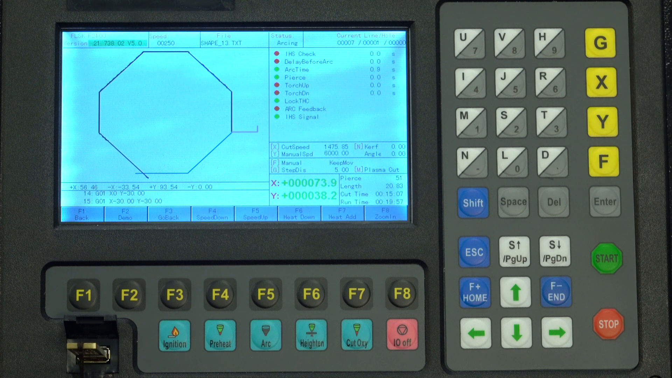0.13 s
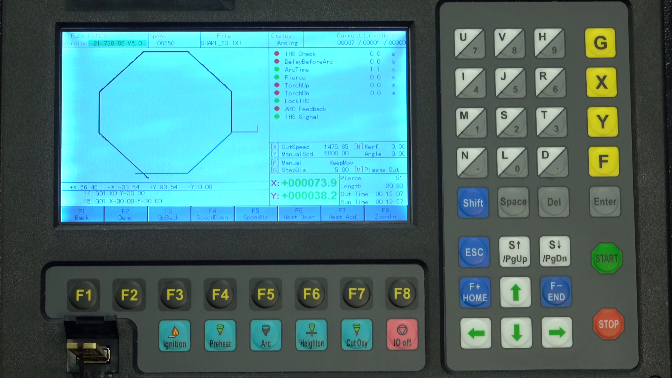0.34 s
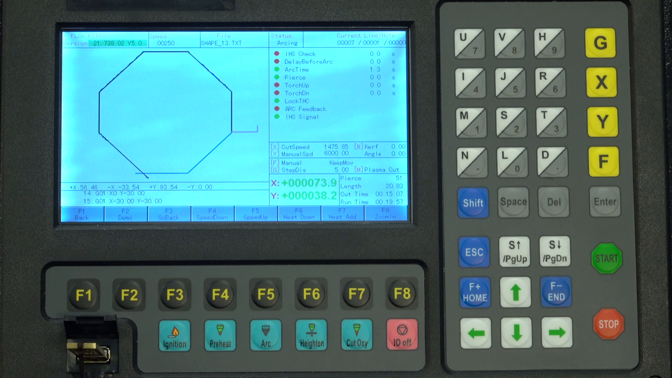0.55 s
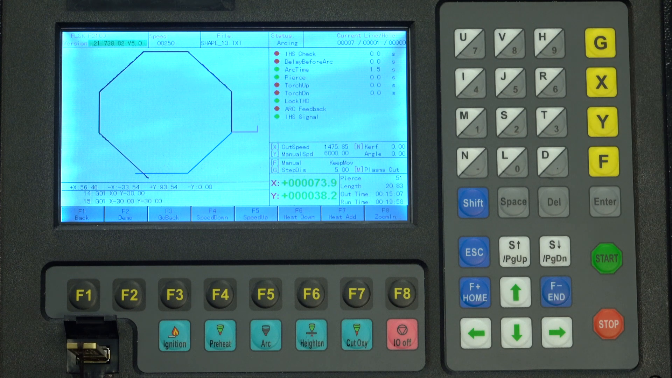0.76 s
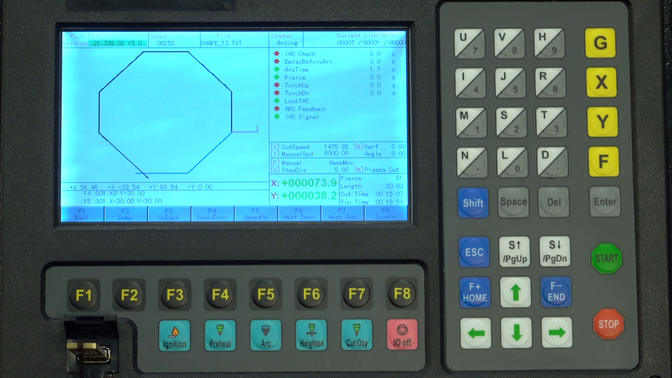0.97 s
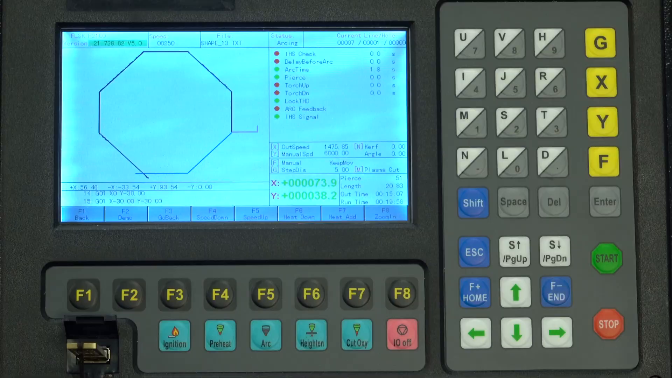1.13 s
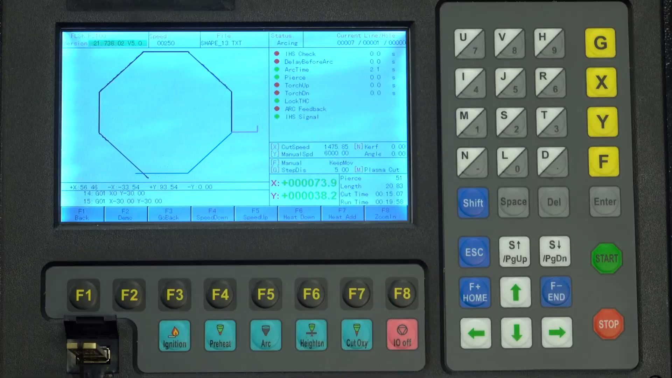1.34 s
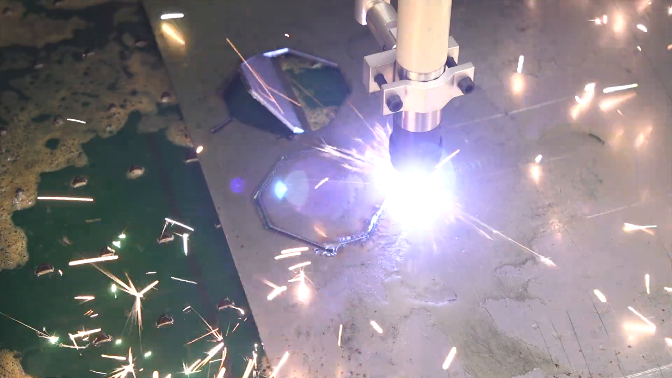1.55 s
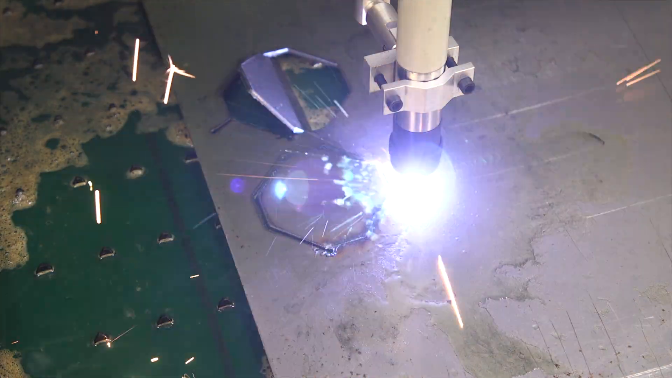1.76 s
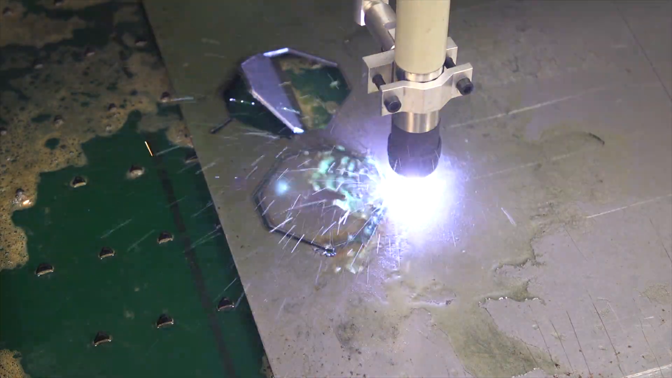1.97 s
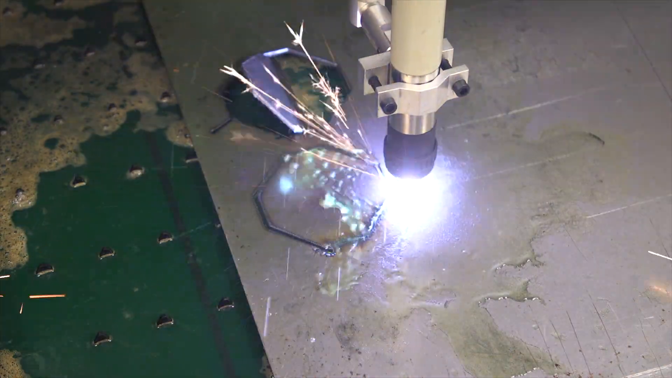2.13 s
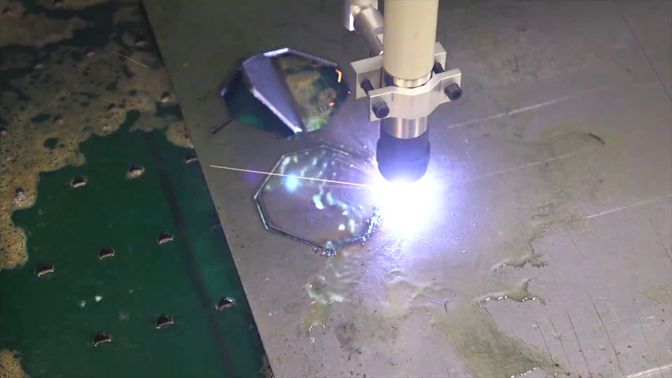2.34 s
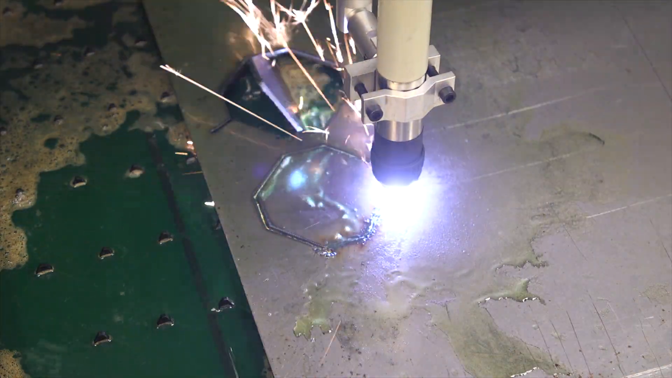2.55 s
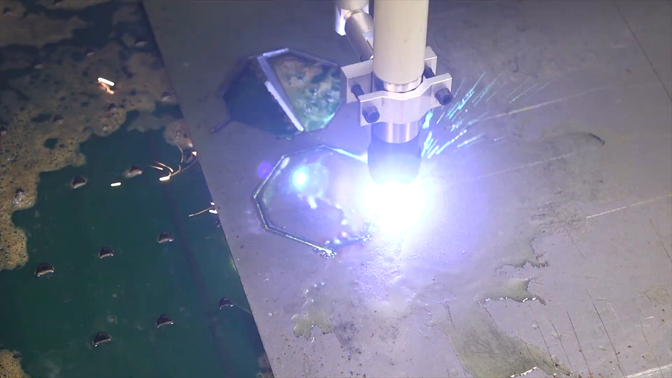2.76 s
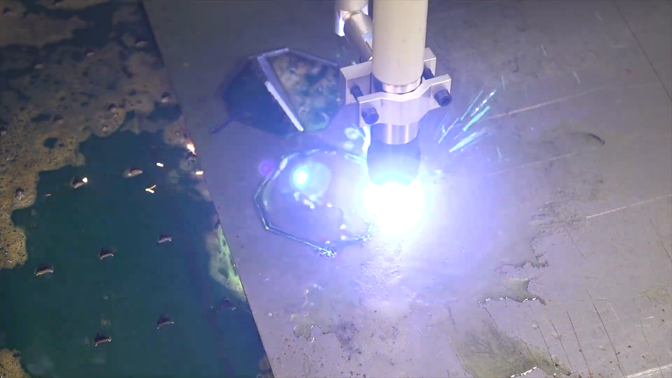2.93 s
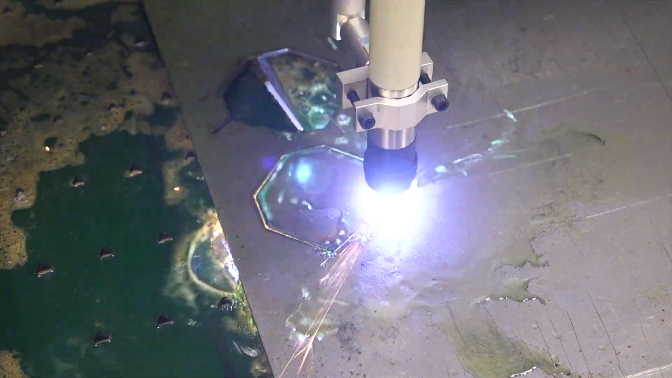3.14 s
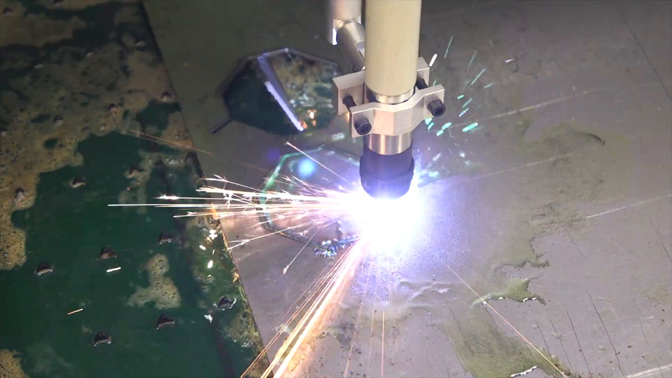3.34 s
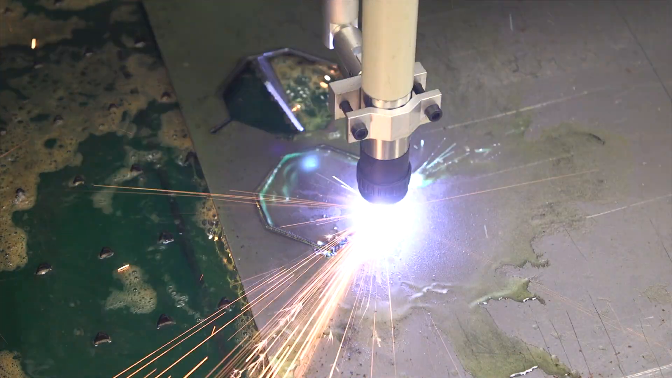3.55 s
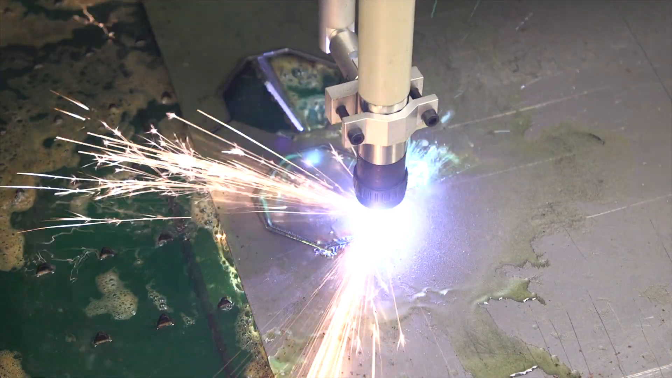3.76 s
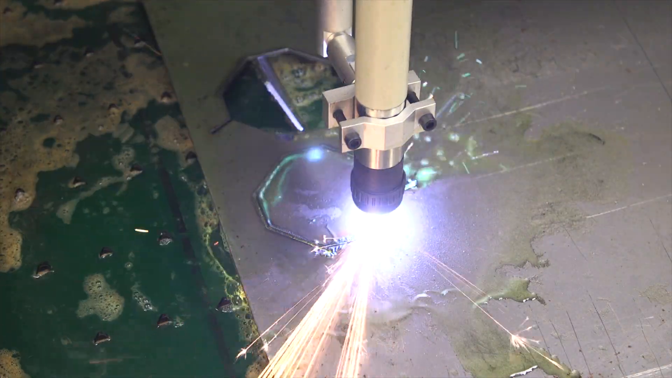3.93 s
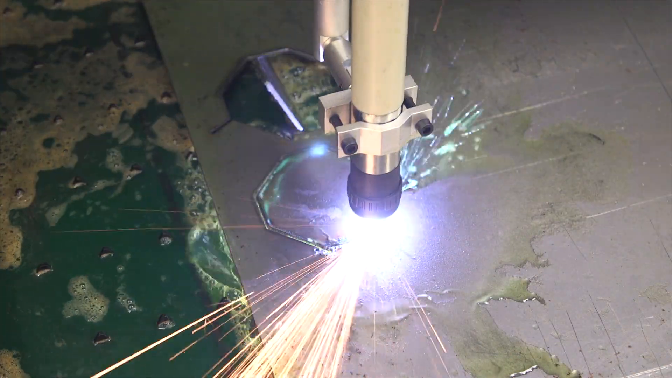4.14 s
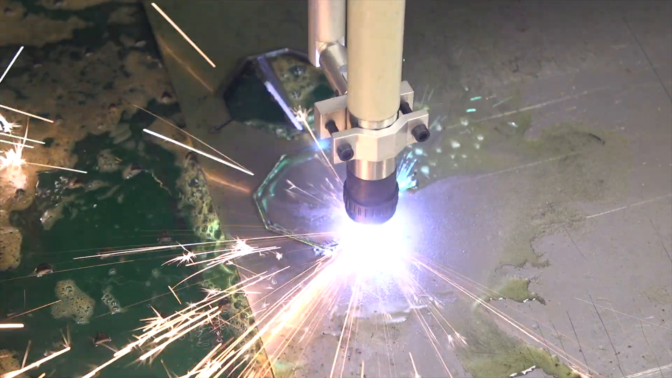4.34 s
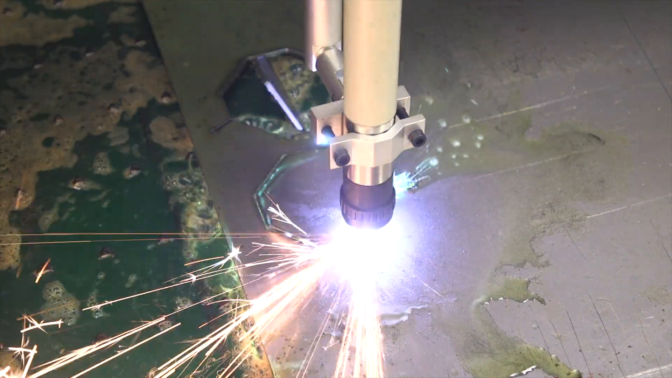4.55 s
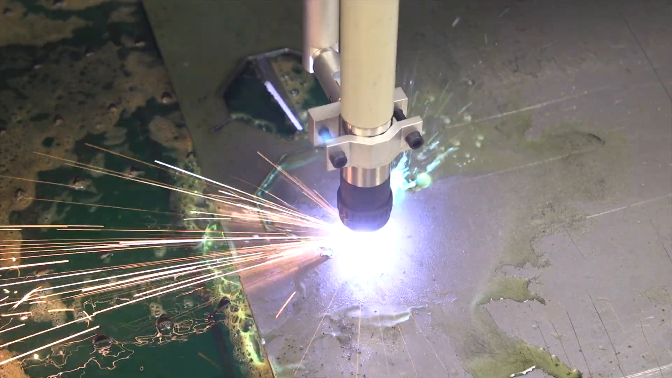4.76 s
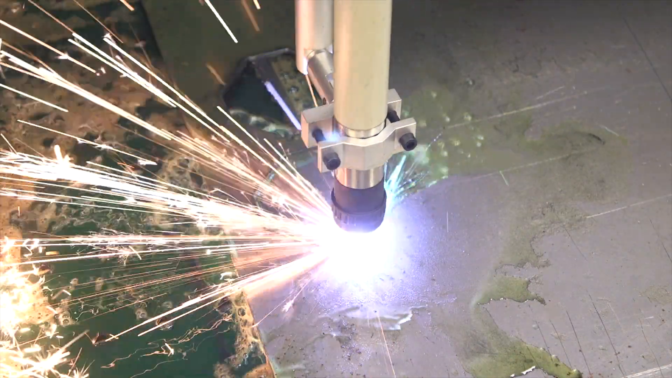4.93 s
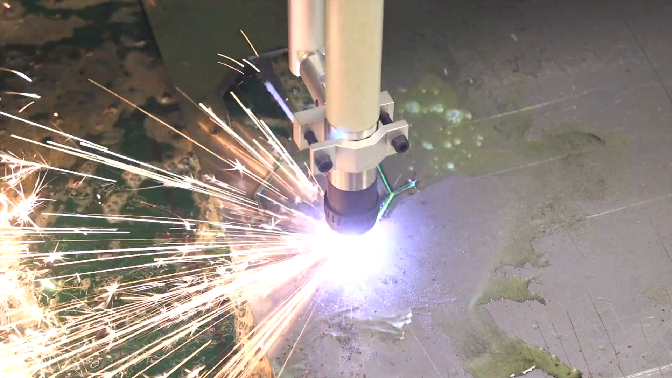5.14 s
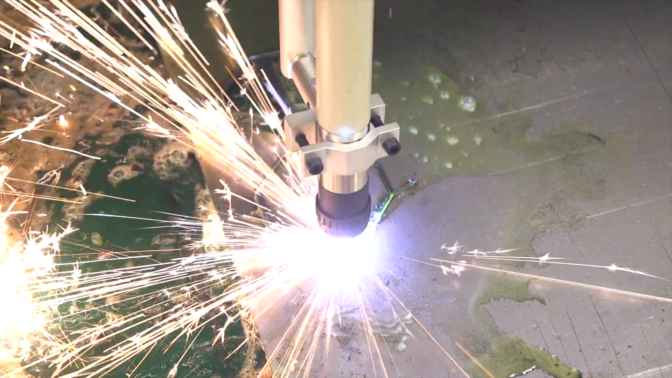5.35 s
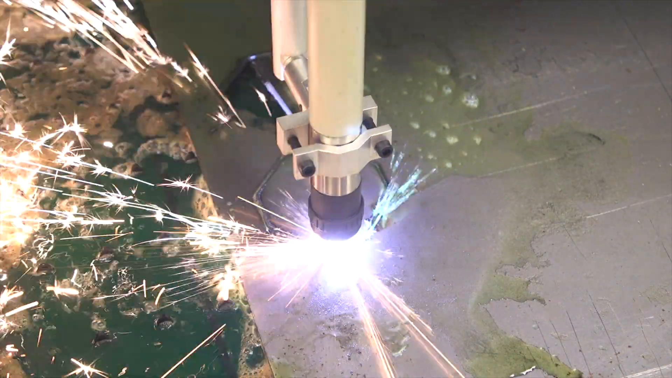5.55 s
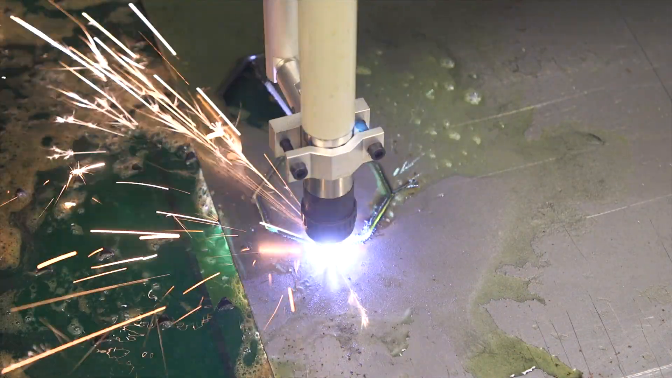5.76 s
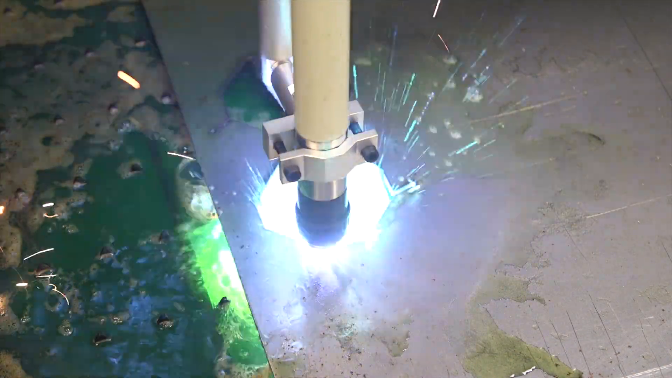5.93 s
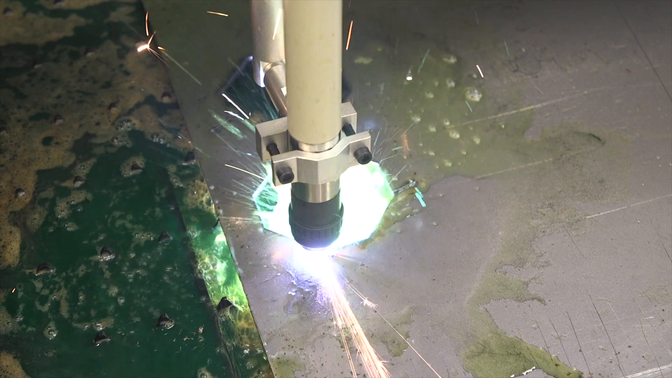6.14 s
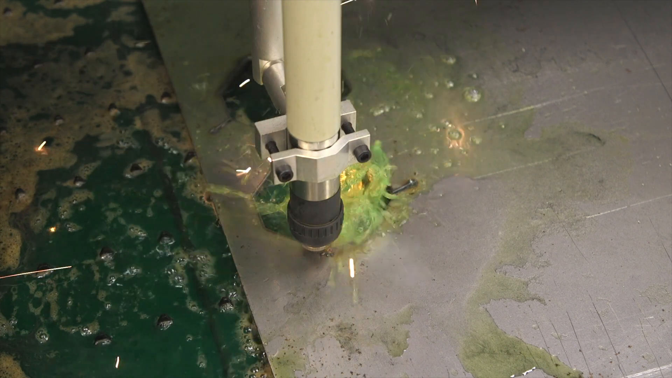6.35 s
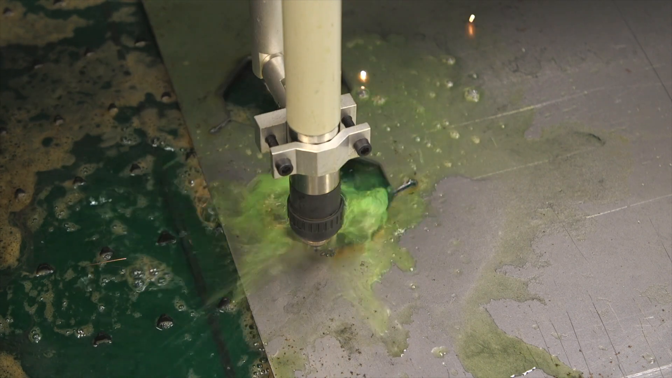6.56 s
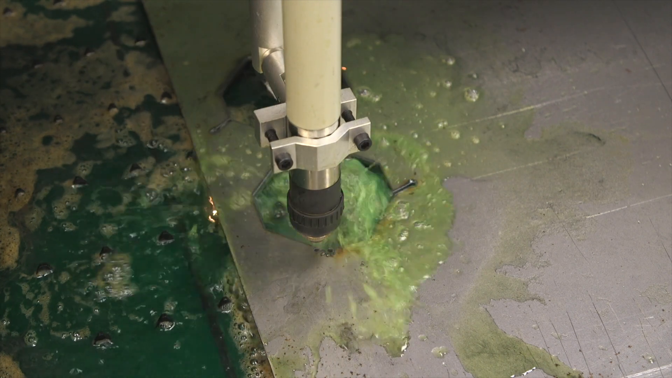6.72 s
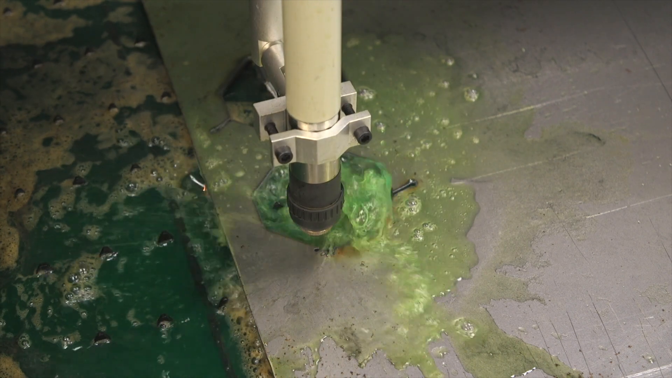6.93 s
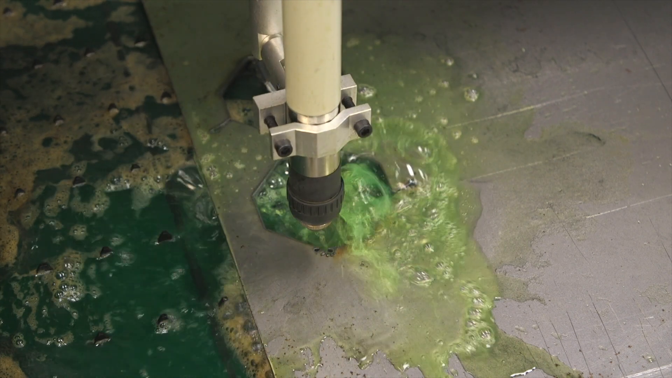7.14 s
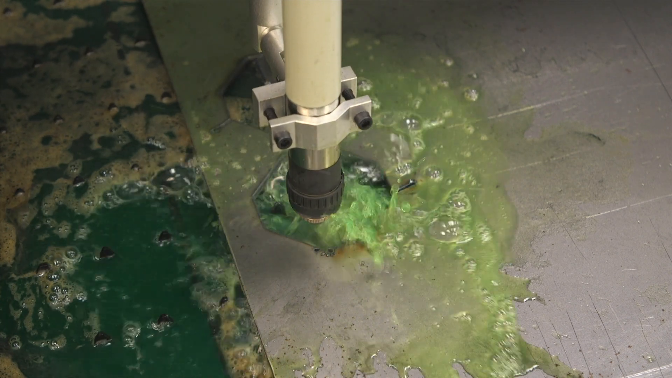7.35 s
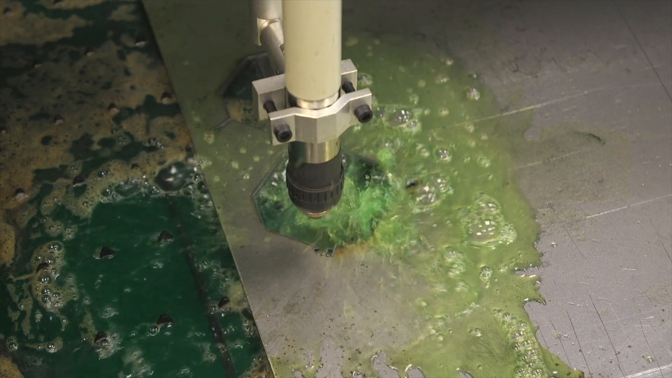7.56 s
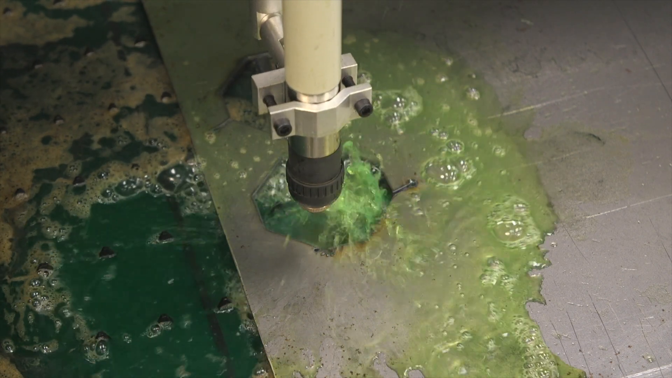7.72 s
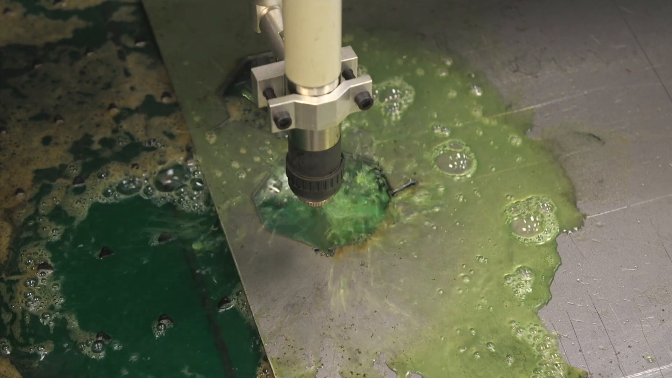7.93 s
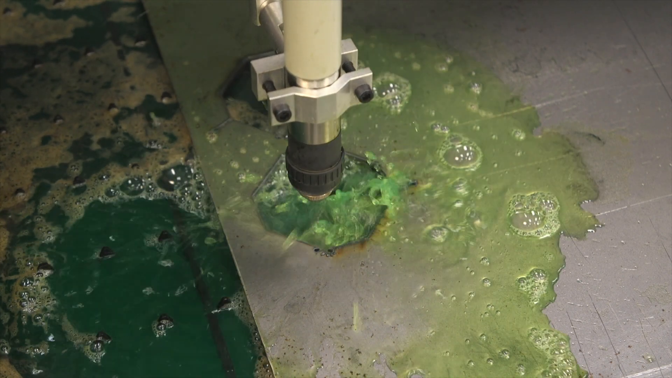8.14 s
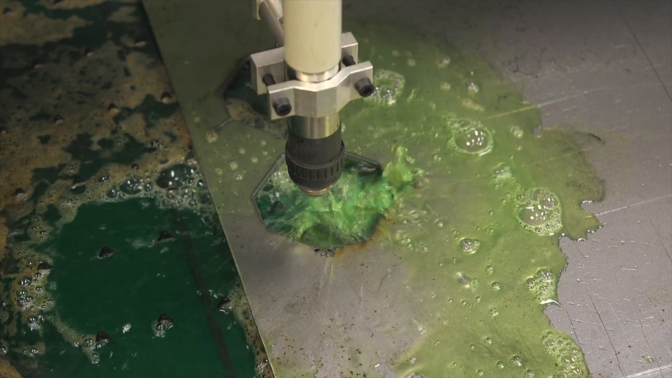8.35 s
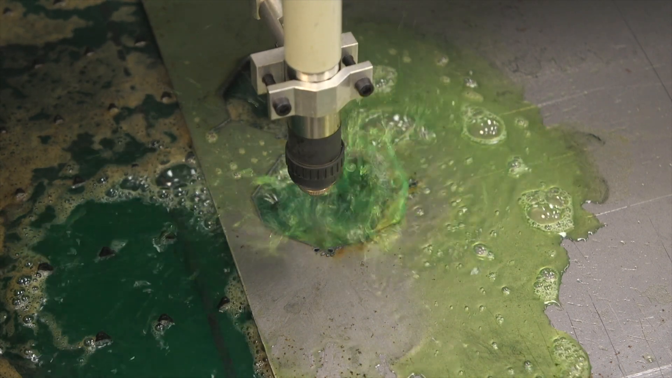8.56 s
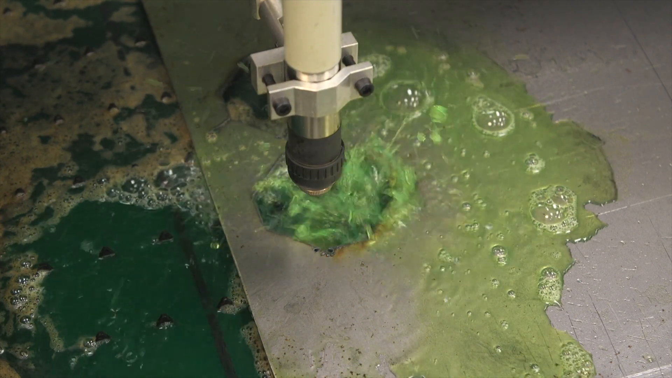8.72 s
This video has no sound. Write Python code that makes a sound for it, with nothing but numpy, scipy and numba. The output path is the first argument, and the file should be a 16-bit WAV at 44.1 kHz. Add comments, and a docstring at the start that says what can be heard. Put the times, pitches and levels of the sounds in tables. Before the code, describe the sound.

A plasma torch cuts steel with a loud hiss, sizzling and churning water, then stops, leaving softer hissing air and bubbling.

```python
"""A machine plasma torch cuts steel plate on a water table in a workshop, heard from close by.
Fans hum and the lift motor runs. At 1.3 s the air valve clacks, a spark spits and the arc strikes.
The jet hisses, slag sizzles and flares, and the blast churns the water under the plate.
At 6.3 s the arc goes out; cooling air keeps hissing and froths the water welling up through the cut."""
import sys
import numpy as np
from scipy import signal
from scipy.fft import rfft, irfft, next_fast_len
from scipy.io import wavfile
from numba import njit

SR = 44100
rng = np.random.default_rng(int(sys.argv[2]) if len(sys.argv) > 2 else 0)


def materialize(psi):
    """Save the field psi as 16-bit PCM at rate SR to the path in sys.argv[1].

    A 1-D psi becomes a single channel; in a 2-D psi each row is a channel.
    """
    bounded = np.clip(np.atleast_2d(psi).T, -1, 1)
    quanta = np.round(bounded * 32767).astype(np.int16)
    wavfile.write(sys.argv[1], SR, quanta)


N = 392049
T = np.arange(N) / SR
HZ = np.maximum(np.fft.rfftfreq(2 * next_fast_len(N // 2 + SR), 1 / SR), 1)
PADDED = 2 * (len(HZ) - 1)
ARC_ON_S, ARC_OFF_S, AIR_ON_S = 1.428, 6.287, 6.31

# rumble of arc and flares: freq_hz, gain_db
RUMBLE_SPECTRUM = [(15, -1.5), (30, 0), (70, -6), (130, -3.5), (250, -7), (2000, -54)]
# resonances of the slot cut in the plate: freq_hz, width_hz, lift_db
KERF_MODES = [(2480, 230, 9.5), (4460, 120, 6), (6320, 250, 12), (6650, 170, 9), (7070, 330, 9.5),
              (7600, 300, 8), (9550, 450, 10), (10300, 450, 11)]


def undb(db):
    return 10 ** (np.asarray(db) / 20)


def unit(x):
    return x / np.std(x)


def filtered(x, gain):
    """Apply a frequency response."""
    return irfft(rfft(x, PADDED) * gain)[:N]


def slope(points):
    """Response through points: freq_hz, gain_db."""
    hz, db = np.transpose(points)
    return undb(np.interp(np.log(HZ), np.log(hz), db))


def resonant(modes):
    """Response of resonances: freq_hz, width_hz, lift_db."""
    return 1 + sum((undb(db) - 1) / (1 + 1j * hz / width_hz * (HZ / hz - hz / HZ))
                   for hz, width_hz, db in modes)


def sweep(x, hz, width_hz):
    """Band-pass with a moving centre: shift down, smooth, shift back."""
    carrier = np.exp(2j * np.pi * np.cumsum(hz) / SR)
    pole = np.exp(-np.pi * width_hz / SR)
    return np.real(signal.lfilter([1 - pole], [1, -pole], x / carrier) * carrier)


def curve(table):
    """Each column after the first, interpolated over time."""
    time_s, *columns = np.transpose(table)
    return [np.interp(T, time_s, column) for column in columns]


def held(start_s, end_s, rise_s, fall_s):
    """Exponential attack, hold at 1, release."""
    return np.exp(np.minimum(T - start_s, 0) / rise_s - np.maximum(T - end_s, 0) / fall_s)


def step(middle_s, width_s):
    """Smooth change from 0 to 1."""
    return .5 + .5 * np.tanh((T - middle_s) / (2 * width_s))


def fade(start_s, t60_s):
    """Sudden start, exponential decay."""
    return (T >= start_s) * np.exp(-np.log(1000) * np.maximum(T - start_s, 0) / t60_s)


def walk(rate_hz):
    """Random wander, spread near 1."""
    steps = rng.standard_normal(N // 20)
    return 1.53 * np.interp(T * rate_hz, np.arange(len(steps)), steps)


def noise(gain):
    """Shaped noise, unit rms."""
    return unit(filtered(rng.standard_normal(N), gain))


def crackle(per_s, spread_db):
    """Random clicks of uneven size."""
    clicks = (rng.random(N) < per_s / SR) * rng.standard_normal(N)
    return clicks * undb(spread_db * rng.standard_normal(N))


@njit
def ring(kicks, hz, cycles, glide):
    """Each kick rings a bubble whose pitch rises as it decays."""
    out = np.zeros(len(kicks))
    for i in np.nonzero(kicks)[0]:
        life = int(cycles * SR / hz[i]) + 1
        phase, size, decay = 0., kicks[i], np.exp(-6. / life)
        for j in range(min(life, len(kicks) - i)):
            phase += 2 * np.pi * hz[i] * (1 + glide * j / life) / SR
            size *= decay
            out[i + j] += size * np.sin(phase)
    return out


def bubbles(hz, per_s, octaves, cycles, spread_db, glide=0.2):
    """Bubble swarm scattered round one pitch."""
    pitch_hz = hz * 2 ** (octaves * np.clip(rng.standard_normal(N), -2, 2))
    kicks = crackle(per_s, spread_db) * np.sqrt(pitch_hz)
    return ring(kicks, pitch_hz, float(cycles), float(glide))


def room(x, echoes=14):
    """Echoes off plate and gantry shift as the torch travels; the hall adds a short tail."""
    early = 0
    for lag, size, travel in rng.random((echoes, 3)):
        delay_s = .002 + .02 * lag + 0.0002444 * (travel - .5) * T
        early = early + (.5 + size) * np.interp(T - delay_s, T, x)
    tail = rng.standard_normal(N) * fade(0.01215, t60_s=0.3)
    late = filtered(x, rfft(tail / np.linalg.norm(tail), PADDED))
    wet = undb(-6.5) * early / np.sqrt(echoes) + undb(-12) * late
    # small steel parts reflect treble best
    tilt = slope([(100, -17), (450, -6.5), (2000, -1.5), (13000, 4)])
    return (x + filtered(wet, tilt)) * undb(-0.5)


def workshop():
    """Ventilation noise, hum, a fan whine and two faint ticks."""
    # ventilation: freq_hz, gain_db
    vent_spectrum = [(15, -12), (48, 0), (130, -7), (180, -14), (450, -14), (650, -9), (800, -12),
                     (1000, -21), (1700, -27), (2600, -34), (5000, -38.5), (15500, -44)]
    # fan and mains hum: pitch_hz, level_db
    hum = [(258.4, -73), (646, -71)]
    # fan whine: time_s, level_db
    whine = [(0, -56.5), (.85, -58), (1.3, -72)]
    # ticks before the arc: start_s, level_db, t60_s
    tick_events = [(.221, -63, .06), (1.0765, -54, .016)]
    vent_db, whine_hz = -57.5, 748.3
    fans = sum(np.sqrt(2) * undb(db + walk(10)) * np.sin(2 * np.pi * hz * T + 0.5 * walk(10))
               for hz, db in hum + [(whine_hz, curve(whine)[0])])
    ticks = noise(slope([(2000, -20), (3500, 2), (5500, 0), (8000, -22)]))
    ticks *= sum(undb(db) * fade(start_s, t60_s) for start_s, db, t60_s in tick_events)
    return noise(slope(vent_spectrum)) * undb(vent_db) + fans + ticks


def lift_motor():
    """The torch lift ramps up and down; its carriage rasps, thin tones emerge at full speed."""
    # torch down, then up, at full speed: start_s, length_s, level_db
    moves = [(0, 0.059, -53), (0.524, 0.18, -57)]
    # motor tones against the rasp: pitch_hz, gain_db
    partials = [(1073, -6), (1314, -7), (1610, -11), (2116, -13), (3332, -14.5), (4151, -23), (4533, -27)]
    ramp_s = 0.39
    rasp = noise(slope([(300, -2.5), (1200, 1.5), (1700, -1), (2800, -9), (4500, -14), (6500, -26),
                        (15000, -16)]))
    tones = sum(np.sqrt(2) * undb(db + 3 * walk(35)) * np.sin(2 * np.pi * hz * T + 1.2 * walk(45))
                for hz, db in partials)
    out = 0
    for start_s, length_s, db in moves:
        speed = np.clip(1 - np.maximum(start_s - T, T - start_s - length_s) / ramp_s, 0, 1)
        out = out + undb(db) * speed ** 2 * (rasp + tones * speed ** 2)
    return out


def ignition():
    """The valve knocks, air puffs out and a spark spits across the nozzle."""
    # air valve knocks: start_s, level_db, t60_s
    knock_events = [(1.268, -51, 0.14), (1.293, -33, 0.23)]
    # ring of the valve: freq_hz, gain_db
    valve_spectrum = [(100, -37), (281, -7), (627, -11), (727, -0.5), (3390, -23), (4860, -19), (5400, -25),
                      (12300, -15), (15500, -21)]
    # air leaving the nozzle: start_s, level_db, pitch_hz, t60_s
    puff_events = [(1.294, -35, 27, 0.28), (1.359, -28, 29.4, 0.38)]
    spark_s, spark_length_s, spark_db = 1.371, 0.0058, -19
    knocks = noise(slope(valve_spectrum) * resonant([(4960, 250, 11), (6900, 300, 5.7)]))
    knocks *= sum(undb(db) * fade(start_s, t60_s) * step(start_s + 0.0018, .001)
                  for start_s, db, t60_s in knock_events)
    puffs = sum(undb(db) * fade(start_s, t60_s) * np.sin(2 * np.pi * hz * (T - start_s))
                for start_s, db, hz, t60_s in puff_events)
    spark_colour = slope([(200, -11), (1500, -2), (4500, -12), (6500, 0), (9000, -8), (14000, 8.5)])
    spark = unit(filtered(crackle(6000, spread_db=-3), spark_colour)) * undb(spark_db)
    spark *= held(spark_s, spark_s + spark_length_s, rise_s=0.0053, fall_s=.004)
    return knocks + puffs + spark


def spurts():
    """Each spurt of air tears off a short swarm of bubbles of nearly one size."""
    # air through the puddle: start_s, length_s, pitch_hz, level_db
    events = [(6.636, 0.027, 1250, -32.5), (6.718, 0.023, 2400, -42), (6.882, 0.03, 2900, -45),
              (7, 0.028, 1060, -39.5), (7.289, .09, 1180, -37), (7.235, .035, 2080, -43),
              (7.42, 0.12, 1206, -36.5), (7.545, 0.12, 1920, -37.5), (7.643, 0.033, 2700, -38),
              (7.862, 0.045, 1850, -35), (7.95, .16, 1790, -36.5), (8.166, 0.055, 1220, -37),
              (8.19, 0.071, 2000, -40), (8.427, 0.06, 1130, -34.5), (8.668, .07, 1187, -32),
              (8.76, .08, 1880, -38)]
    edge_s, scatter_octaves, cycles, glide = .008, .045, 38., .05
    out, t = np.zeros(N + SR), T[:SR // 3]
    kicks = np.resize(crackle(3000, spread_db=-0.5), len(out))
    scatter = 2 ** (scatter_octaves * rng.standard_normal(len(out)))
    for start_s, length_s, hz, db in events:
        span = slice(int(start_s * SR), int(start_s * SR) + len(t))
        envelope = (1 - np.exp(-t / edge_s)) * np.exp(-np.maximum(t - length_s, 0) / edge_s)
        out[span] += undb(db) * envelope * unit(ring(kicks[span], hz * scatter[span], cycles, glide))
    return out[:N]


def puddle(covered_s):
    """The tank sloshes and settles; air makes the water round the nozzle gurgle, spurt and froth."""
    slosh_db, burble_db = -29.5, -46
    froth_s, froth_db, thinning_db_per_s = 7.42, -33.5, 2
    covered = step(covered_s, 0.05)  # 0: cut open, 1: under water
    gurgle_hz = np.interp(covered, [0, 1], [988, 1208]) * np.exp(0.045 * walk(16))
    octaves = np.interp(covered, [0, 1], [.24, .11])
    gurgle = unit(bubbles(gurgle_hz, per_s=3000, octaves=octaves, cycles=20, spread_db=1.5, glide=.05))
    gurgle *= undb(np.interp(covered, [0, 1], [-43.5, -38.5]) + 1.8 * walk(24))
    slosh = unit(bubbles(760, per_s=6000, octaves=0.52, cycles=14, spread_db=.5))
    slosh *= undb(slosh_db) * fade(ARC_OFF_S, t60_s=3.2) + covered * undb(burble_db)
    slosh *= undb(1.9 * walk(25))
    froth = unit(bubbles(1820, per_s=3000, octaves=0.094, cycles=24, spread_db=1, glide=0.091))
    fizz = unit(bubbles(2400, per_s=2300, octaves=0.088, cycles=8.2, spread_db=-2))
    foam = (froth + fizz * undb(-9)) * step(froth_s, 0.21)
    foam *= undb(froth_db - thinning_db_per_s * (T - froth_s) + walk(20))
    tilt = slope([(150, -17), (500, -10.5), (1000, -2.5), (2700, 3.5), (7000, 9.5)])
    return step(AIR_ON_S, 0.0079) * filtered(gurgle + spurts() + slosh + foam, tilt)


def cooling_air(covered_s):
    """Air without arc: thin hiss, low draught and fine spray that drowns as the puddle spreads."""
    # hiss, spray and draught: freq_hz, gain_db
    hiss_spectrum = [(4000, -48), (8000, -11), (9500, -1.5), (11500, 2), (13500, 4), (15500, 3.5)]
    spray_spectrum = [(200, -9.5), (600, 0), (1500, 1), (2800, 3), (4500, 1.5), (7000, 3), (10000, -1.5),
                      (15500, -4)]
    draught_spectrum = [(20, 5.5), (45, 12), (80, -9), (130, -2.5), (200, -22), (1000, -49)]
    # hiss of the air flow: time_s, level_db
    flow = [(6.36, -39.5), (6.63, -35), (6.93, -28.5), (7.0, -33.5), (7.12, -31.5), (7.45, -31),
            (8.88, -36)]
    # hiss sharpens, then dulls as water closes round the nozzle: time_s, centre_hz
    hiss_band = [(6.6, 13200), (6.95, 15200), (7.2, 14600), (7.55, 12800), (8.2, 13000)]
    spray_peak_db, grow_db_per_s, drown_db_per_s, draught_db = -35.5, 7, 15, -56.5
    hiss = unit(sweep(noise(slope(hiss_spectrum)), curve(hiss_band)[0], width_hz=5600))
    hiss *= undb(curve(flow)[0] + 0.65 * walk(70))
    spray = unit(filtered(crackle(12000, spread_db=1.5), slope(spray_spectrum)))
    drop_db = np.maximum(grow_db_per_s * (covered_s - T), drown_db_per_s * (T - covered_s))
    spray *= undb(spray_peak_db - drop_db + walk(50))
    draught = noise(slope(draught_spectrum)) * undb(draught_db)
    return step(AIR_ON_S, 0.014) * (hiss + spray + draught)


def plunge():
    """A gas pocket swells: its bubbles grow, so the gulp falls in pitch."""
    # deep gulp as the jet breaks through again: time_s, pitch_hz, level_db
    gulp = [(5.88, 1430, -27), (5.925, 1010, -29), (5.955, 615, -23.5), (5.972, 290, -25)]
    hz, db = curve(gulp)
    swarm = bubbles(hz, per_s=5000, octaves=0.19, cycles=7.6, spread_db=3, glide=.02)
    return unit(swarm) * undb(db) * held(gulp[0][0], gulp[-1][0], rise_s=.012, fall_s=0.01)


def glugs():
    """Single large bubbles break free and ring, their pitch wobbling and rising."""
    # bubbles that stand out of the boil: start_s, length_s, pitch_hz, level_db
    events = [(1.709, 0.031, 241, -25), (1.797, 0.039, 430, -19), (1.829, 0.019, 560, -17.5),
              (1.854, 0.046, 224, -21), (2.25, 0.034, 531, -18.5), (2.785, 0.035, 353, -20),
              (3.11, 0.06, 486, -22), (3.21, 0.05, 441, -21.5), (4.228, 0.025, 397, -19),
              (4.475, 0.023, 1303, -19), (4.486, 0.018, 553, -15.5), (4.724, 0.091, 661, -22),
              (5.293, .03, 662, -20), (6.26, 0.02, 1115, -15.5)]
    rise_s, fall_s, glide_per_s = 0.0082, 0.0078, 0.59
    out, t = np.zeros(N + SR), T[:SR // 4]
    wobble = 0.0537 * walk(70)
    for start_s, length_s, hz, db in events:
        span = slice(int(start_s * SR), int(start_s * SR) + len(t))
        pitch_hz = hz * (1 + glide_per_s * (t - length_s / 2) + wobble[span])
        envelope = (1 - np.exp(-t / rise_s)) * np.exp(-np.maximum(t - length_s, 0) / fall_s)
        out[span] += undb(db) * envelope * np.sin(2 * np.pi * np.cumsum(pitch_hz) / SR)
    return out[:N]


def churn():
    """The blast boils the water and tears off gulps of bubbles, coloured by the hollow tank."""
    # tank under the plate: freq_hz, width_hz, lift_db
    tank_modes = [(238, 53, 6), (348.5, 54, 9.5), (438, 65, 4), (533, 71, 6.5), (661, 125, 7), (820, 33, 6),
                  (1043, 140, 5), (1323, 290, 7.5), (2240, 270, 10.5)]
    # big bubbles, largest just after the pierce: time_s, pitch_hz
    big_pitch = [(1.5, 560), (1.72, 370), (1.82, 460), (1.91, 245), (2.26, 527), (2.65, 584), (2.8, 371),
                 (3.5, 490), (4.8, 523), (6.28, 490)]
    # steady boil between gulps: time_s, level_db
    boil_levels = [(1.54, -32.5), (2.3, -27.5), (5.3, -25.5), (5.6, -31), (6.29, -31.5)]
    # gas breaking into the water: start_s, length_s, big_db, small_db
    gulps = [(1.536, 0.019, -22.5, -30.5), (1.625, 0.11, -26, -33), (1.794, 0.057, -18, -26),
             (1.898, 0.082, -22.5, -32.5), (2.054, 0.095, -23, -32.5), (2.185, 0.11, -22, -28),
             (2.32, 0.055, -22, -25.5), (2.426, 0.047, -22, -25.5), (2.583, 0.052, -26.5, -21.5),
             (2.782, 0.037, -22.5, -42), (2.865, 0.14, -23, -35), (3.105, 0.19, -25.5, -28.5),
             (3.273, 0.071, -26.5, -25), (3.427, 0.033, -22, -24.5), (3.501, 0.062, -23.5, -24.5),
             (3.689, 0.086, -24, -28), (3.958, 0.24, -23.5, -26), (4.196, 0.32, -25.5, -26.5),
             (4.448, 0.043, -24, -23), (4.61, 0.077, -22.5, -23), (4.727, 0.022, -23, -25),
             (4.791, 0.065, -21.5, -24.5), (5.06, 0.26, -25, -28.5), (5.328, 0.049, -30, -24),
             (6.022, 0.1, -30.5, -22.5), (6.107, 0.12, -32, -22.5), (6.21, 0.057, -34, -20)]
    rise_s, fall_s, wander = 0.017, 0.026, .13
    big_hz = curve(big_pitch)[0] * np.exp(wander * walk(22))
    big = bubbles(big_hz, per_s=4000, octaves=0.43, cycles=9.3, spread_db=1.56, glide=0.013)
    small_hz = 1183 * np.exp(wander / 2 * walk(25))
    small = bubbles(small_hz, per_s=3000, octaves=0.25, cycles=16, spread_db=3.5)
    tank = resonant(tank_modes)
    big_colour = slope([(80, -16), (170, -19.5), (225, -6.5), (285, -10), (350, -5), (750, 1),
                        (1400, -10), (4000, -25)])
    small_colour = slope([(200, -12), (800, -5), (2300, -1), (4000, 5.5)])
    big = unit(filtered(big, tank * big_colour))
    small = unit(filtered(small, tank * small_colour))
    boil = held(boil_levels[0][0], ARC_OFF_S, rise_s, fall_s) * undb(curve(boil_levels)[0])
    big_gain, small_gain = boil, boil * undb(-7.5)
    for start_s, length_s, big_db, small_db in gulps:
        gulp = held(start_s, start_s + length_s, rise_s, fall_s)
        big_gain = np.maximum(big_gain, gulp * undb(big_db))
        small_gain = np.maximum(small_gain, gulp * undb(small_db))
    flutter, small_flutter = undb(0.82 * walk(45)), undb(0.52 * walk(70))
    return flutter * (big * big_gain + small * small_gain * small_flutter)


def flares():
    """Where the jet fails to get through, slag bursts back with a rumble and a coarse crackle."""
    # slag thrown out of the cut: start_s, length_s, rumble_db, crackle_db
    bursts = [(2.25, 0.34, -35.5, -36), (5.34, 0.11, -43, -25.5), (5.608, 0.26, -39, -29),
              (5.989, 0.055, -47, -27.5), (6.171, 0.085, -38, -30.5)]
    # slag crackle: freq_hz, gain_db
    crackle_spectrum = [(200, 1), (900, 3), (1700, 6), (2400, 0.5), (3400, 0), (5000, -3), (7000, -32),
                        (12000, -28)]
    rumble = noise(slope(RUMBLE_SPECTRUM))
    clicks = crackle(6000, spread_db=4.5)
    coarse = unit(filtered(clicks, slope(crackle_spectrum) * resonant(KERF_MODES)))
    out = np.zeros(N)
    for start_s, length_s, rumble_db, crackle_db in bursts:
        envelope = held(start_s, start_s + length_s, rise_s=0.0038, fall_s=0.034)
        out += envelope * (rumble * undb(rumble_db) + coarse * undb(crackle_db))
    return out


def pierce():
    """The jet sings briefly across the edge of the new hole."""
    # hole tones: start_s, length_s, pitch_hz, level_db
    tones = [(1.43, .12, 11200, -36), (1.43, .14, 14650, -33), (2.25, .26, 12900, -29),
             (2.32, .18, 14900, -33)]
    out = np.zeros(N)
    for start_s, length_s, hz, db in tones:
        band = unit(sweep(rng.standard_normal(N), hz + 40 * walk(8), width_hz=160))
        out += undb(db) * band * held(start_s, start_s + length_s, rise_s=0.05, fall_s=0.05)
    return out * step(ARC_ON_S, .01)


def torch():
    """The jet hisses, molten slag sizzles out of the kerf and the arc rumbles."""
    # blowback from the plate: time_s, jet_db, slag_db
    blowback = [(1.42, -20.5, -28.5), (1.5, -21, -27), (1.66, -26.5, -32.5), (2.06, -27.5, -32),
                (2.45, -20.5, -25.5), (2.5, -24, -29), (2.66, -25.5, -30), (2.73, -30.5, -36),
                (2.84, -30.5, -37), (3.16, -28.5, -34.5), (3.26, -22, -26.5), (3.38, -23.5, -29.5),
                (4.06, -22.5, -27.5), (4.91, -25, -29), (5.33, -21.5, -25), (5.36, -19.5, -23),
                (5.53, -18.5, -18.5), (5.74, -21.5, -22), (5.85, -21, -26.5), (5.94, -30.5, -32),
                (6.02, -23, -29.5), (6.08, -26, -30), (6.24, -21.5, -26.5), (6.28, -28, -28.5)]
    # jet hiss and slag sizzle: freq_hz, gain_db
    jet_spectrum = [(2500, -31), (6000, -25.5), (8500, -8.5), (10500, 2.5), (13000, 3.5), (15500, -2)]
    slag_spectrum = [(60, 3), (600, 2.5), (1000, 8), (2000, 2.5), (3100, -1.5), (5700, -2), (8500, 3),
                     (15500, -22)]
    # gap between nozzle, clamp and plate: freq_hz, width_hz, lift_db
    gap_modes = [(7720, 410, 6.5), (10430, 240, 3), (15000, 1000, 4.5)]
    # metallic colour of the plate: freq_hz, width_hz, lift_db
    plate_modes = [(4560, 220, 4), (5050, 200, -3.5), (5500, 260, 4.5)]
    # two jet whistles, climbing as the cut lengthens: time_s, low_hz, low_db, high_hz, high_db
    whistles = [(1.5, 12700, -11, 14300, -8), (2.6, 12900, -11, 14600, -4), (3.65, 13400, -9, 15200, -5),
                (4.95, 13300, -7, 15400, -5), (6.2, 13600, -7, 15550, -7)]
    rumble_db, flutter_db = -48.5, 2.5
    jet_db, slag_db = curve(blowback)
    low_hz, low_db, high_hz, high_db = curve(whistles)
    jet = noise(slope(jet_spectrum) * resonant(gap_modes))
    for hz, db in ((low_hz, low_db), (high_hz, high_db)):
        jet += undb(db) * unit(sweep(rng.standard_normal(N), hz + 80 * walk(9), width_hz=300))
    jet = unit(jet) * undb(jet_db + .5 * walk(90))
    spatter = filtered(crackle(20000, spread_db=1), slope(slag_spectrum))
    # harder blowback rings the kerf more
    kerf_share = 1 / (1 + undb(-2 * (slag_db + 24)))
    slag = unit(spatter) * (1 - kerf_share) + unit(filtered(spatter, resonant(KERF_MODES))) * kerf_share
    slag *= undb(slag_db + 0.63 * walk(60))
    rumble = noise(slope(RUMBLE_SPECTRUM)) * undb(rumble_db + flutter_db * walk(14))
    arc_on = held(ARC_ON_S, ARC_OFF_S, rise_s=0.026, fall_s=0.0046)
    return arc_on * (filtered(jet + slag, resonant(plate_modes)) + rumble)


def scene():
    """Torch and water in the room, over lift motor and shop; both channels alike."""
    covered_s = 7.224  # the puddle closes over the cut
    cutting = torch() + pierce() + flares() + churn() + glugs() + plunge()
    after_cut = cooling_air(covered_s) + puddle(covered_s)
    mono = room(cutting + after_cut + ignition()) + lift_motor() + workshop()
    return np.array([mono, mono])


def record(dry):
    """Steep low-pass at the top of the treble."""
    cutoff_hz = 15800
    return signal.sosfilt(signal.ellip(12, .1, 80, cutoff_hz, fs=SR, output="sos"), dry)


dry = scene()
out = record(dry)
materialize(out)
```